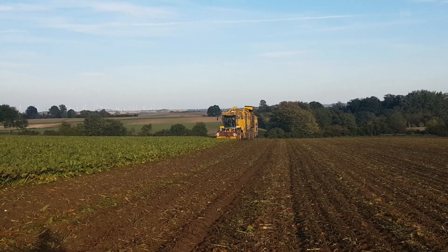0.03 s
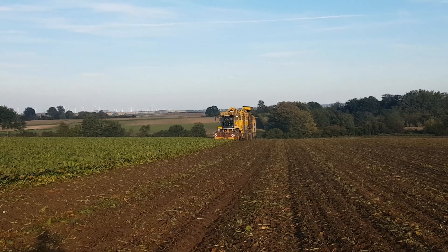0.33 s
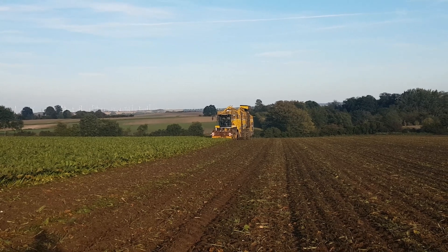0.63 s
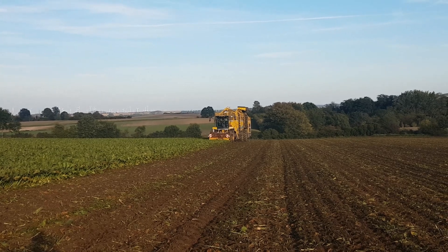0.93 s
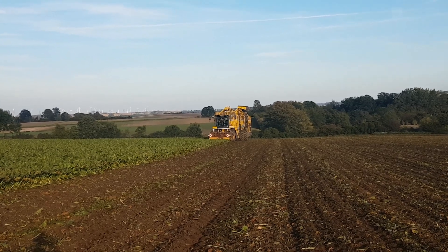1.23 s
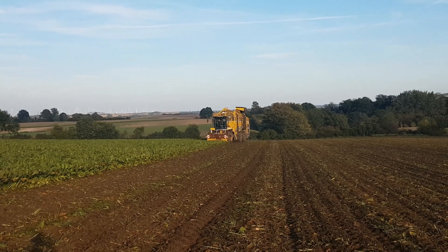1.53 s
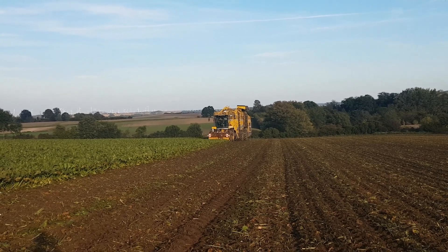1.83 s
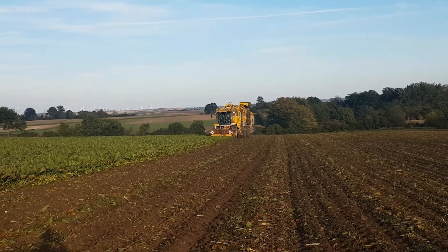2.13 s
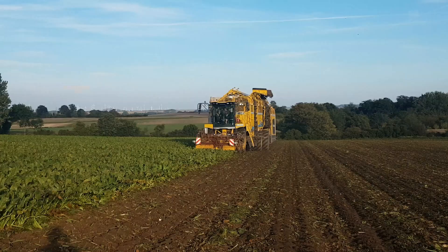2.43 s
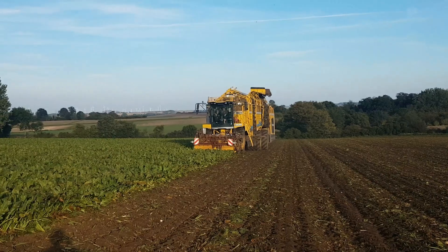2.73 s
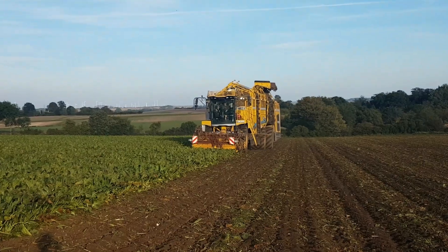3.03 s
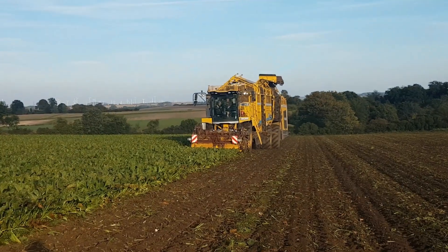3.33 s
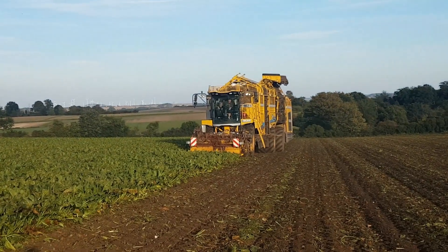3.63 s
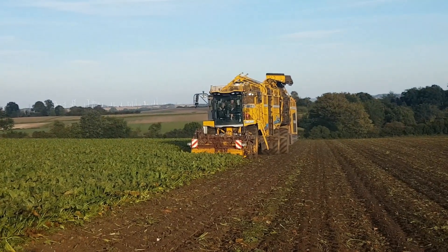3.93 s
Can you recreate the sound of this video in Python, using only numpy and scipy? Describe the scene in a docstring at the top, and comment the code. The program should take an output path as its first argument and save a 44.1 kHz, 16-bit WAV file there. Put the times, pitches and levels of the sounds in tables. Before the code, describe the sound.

A large harvesting machine drones and rattles far across a field, slightly right of the microphone. The engine swells, then with a small click it is abruptly near, its clatter and hum louder, with hard knocks and a few ticks.

```python
"""A beet harvester works along a field towards a stereo microphone, first far off, then abruptly near.
Its diesel exhaust drones and beats against a slightly faster shaft, the leaf flail hums, and the
machinery hisses and clatters in time with the firings, with scattered hard knocks. A small click marks
the jump in distance, and close up a few bright ticks come through. The machine stands right of centre,
over faint microphone hiss."""
import sys
import numpy as np
from scipy.fft import rfft, irfft, next_fast_len
from scipy.io import wavfile
from scipy.ndimage import map_coordinates

SR = 44100
rng = np.random.default_rng(int(sys.argv[2]) if len(sys.argv) > 2 else 0)


def waveform_to_disk(signal):
    """Save audio, clipped to [-1, 1], as 16-bit WAV at the path in sys.argv[1]."""
    frames = np.transpose(np.atleast_2d(signal))
    scaled = np.clip(frames, -1, 1) * 32767
    samples = np.round(scaled).astype(np.int16)
    wavfile.write(sys.argv[1], SR, samples)


N = 176400
NEAR_START_S, TOP_HZ = 2.4205, 15780

# engine speed: time_s, firing_hz
FIRING_RATE = [(0, 63.8), (.7, 63.5), (1.3, 63.7), (1.7, 62.95), (2.3, 62.75), (2.9, 62.85), (3.25, 64),
               (3.6, 63.7), (4, 63.4)]
# exhaust gain, rising with the approach: time_s, gain_db
EXHAUST_GAIN = [(0, -46), (.8, -46), (1.55, -46), (1.75, -44), (1.95, -38), (2.15, -36.5), (2.4, -34.5),
                (2.44, -29.5), (3.1, -29.5), (3.55, -28), (4, -27.5)]
# overtone mix of the exhaust: firing_multiple, far_db, near_db
EXHAUST_OVERTONES = [(1, -22, -14), (2, -.5, 0), (3, -3.5, -5), (4, -18, -17), (5, -23, -30),
                     (6, -33, -30.5)]
# how much faster than the firings the shaft turns: time_s, beat_hz
SHAFT_BEAT = [(0, 4.55), (2.2, 4.45), (2.5, 5), (2.9, 4.3), (3.2, 3.7), (4, 3.7)]
# overtone mix of the shaft: shaft_multiple, relative_db
SHAFT_OVERTONES = [(1, -10), (2, -13), (3, -18.5)]
# colour of the exhaust puffs: frequency_hz, relative_db
RUMBLE_COLOUR = [(20, -20), (45, -23.5), (70, -5), (115, 2.5), (170, 0.5), (220, -1.5), (280, -21),
                 (400, -40), (800, -82)]
# hum of the leaf flail: rotor_multiple (rounded in use), far_db, near_db (before the swell)
FLAIL_OVERTONES = [(17, -70, -63.5), (18, -62, -51.5), (20, -61.5, -55.5), (21, -65, -68), (25, -70.5, -59),
                   (34, -56.5, -45.5), (36, -56, -47), (40, -57.5, -52), (44, -60.5, -67),
                   (48, -61.5, -60.5), (70.9, -70, -57.5)]
# swell of the flail once near: time_s, gain_db
FLAIL_NEAR_SWELL = [(2.42, 0), (2.8, -5), (2.96, 2.5), (3.3, -0.5), (3.6, 2.5), (4, 2.5)]
# machinery noise far and near, notched by the ground reflection: frequency_hz, relative_db
FAR_COLOUR = [(150, -18), (290, -19.5), (350, -11), (410, -15), (500, -9), (640, -1), (850, -0.5),
              (1000, -10.5), (1150, -3.5), (1320, 0.5), (1560, -13), (1750, -4), (1950, -7), (2160, -19.5),
              (2400, -10), (2750, -13.5), (3220, -6), (3480, -14.5), (3680, -11), (3980, -19.5),
              (4750, -17.5), (5130, -15.5), (5450, -21.5), (6500, -27), (7500, -37), (9500, -55.5),
              (15500, -56)]
NEAR_COLOUR = [(150, -8), (280, 1.5), (400, -4), (490, -4), (570, 3.5), (700, 6), (820, 4), (960, -5.5),
               (1100, 1.5), (1400, -3), (1750, 1), (2000, -14), (2220, -1), (2540, -12.5), (2870, -3.5),
               (3220, -8), (3530, -2.5), (3880, -10), (4300, -4), (4750, -10), (5500, -18), (6500, -19.5),
               (7500, -26.5), (8500, -31), (10000, -37.5), (15500, -36)]
# machinery loudness far and near: time_s, level_db
FAR_LOUDNESS = [(0, -45), (.35, -44), (.8, -46), (1.02, -46), (1.15, -43.5), (1.45, -44.5), (1.9, -44.5),
                (2.2, -44.5), (2.42, -45.5)]
NEAR_LOUDNESS = [(2.42, -39.5), (2.65, -39), (2.9, -38.5), (3.07, -41), (3.22, -38.5), (3.4, -39),
                 (3.54, -37.5), (3.62, -40.5), (3.7, -39), (4, -38.5)]
# hard knocks in the machinery: start_s, level_db
KNOCK_HITS = [(.652, -42), (2.471, -38), (2.648, -36), (3.012, -39), (3.244, -38), (3.513, -37),
              (3.545, -38), (3.685, -34), (3.78, -36), (3.987, -35)]
# colour of a knock: frequency_hz, relative_db
KNOCK_SPECTRUM = [(500, -20), (1500, -3), (2600, -4), (4300, 0), (5500, -13), (9000, -32), (15000, -48)]
# small bright ticks: start_s, level_db
TICK_HITS = [(2.472, -57), (3.404, -46), (3.722, -46.5)]
# colour of a tick: frequency_hz, relative_db
TICK_SPECTRUM = [(1500, -32), (5000, 8), (9000, -8), (15000, -16)]
# the machine's place in the stereo image: frequency_hz, left_minus_right_db
STEREO_BALANCE = [(60, .3), (125, -1.1), (190, -1.5), (270, -2.6), (450, -3.8), (740, -4.9), (1220, -4.3),
                  (2000, -5), (3300, -11), (5500, -12.5), (7000, -5), (9000, 1), (15000, -2)]
# likeness of the noise left and right: frequency_hz, correlation
STEREO_LIKENESS = [(100, .997), (500, .985), (1000, .96), (2000, .93), (4000, .88), (8000, .7), (12000, .3)]
# mismatch of the two microphone ports: frequency_hz, right_lead_rad
MIC_PORT_PHASE = [(64, .3), (127, .34), (330, .25), (1200, .11), (1800, .2), (2800, .6), (4200, .4),
                  (8000, 0)]
# colour of the microphone hiss: frequency_hz, relative_db; then its overall level
HISS, HISS_DB = [(100, 0), (8000, 1), (10000, -2.6), (13000, 0), (15500, -2)], -70


def amp(db):
    """Decibels to gain."""
    return 10 ** (np.asarray(db) / 20)


def unit(x):
    """Scale to rms 1."""
    return x / np.sqrt(np.mean(x ** 2) + 1e-20)


def along(rows, hz):
    """Read (frequency_hz, value) rows on a log axis."""
    frequencies, values = np.transpose(rows)
    return np.interp(np.log(hz + 1), np.log(frequencies + 1), values)


def curve(rows):
    """(time_s, value) rows as one value per sample."""
    return np.interp(np.arange(N) / SR, *np.transpose(rows))


def wobble(rate_hz):
    """A smooth random curve with rate_hz knots a second."""
    return map_coordinates(rng.standard_normal(2048), [np.arange(N) * rate_hz / SR + 4], mode="mirror")


def filtered(x, response):
    """Pass x through a frequency response."""
    size = next_fast_len(N + SR // 2)
    return irfft(rfft(x, size) * response(np.fft.rfftfreq(size, 1 / SR)), size)[..., :N]


def noise(colour):
    """Coloured stereo noise of rms 1, nearly mono in the bass."""
    def mid_and_side(hz):
        width = np.arccos(along(STEREO_LIKENESS, hz)) / 2
        return amp(along(colour, hz)) * [np.cos(width), np.sin(width)]
    mid, side = filtered(rng.standard_normal((2, N)), mid_and_side)
    return unit(np.array([mid + side, mid - side]))


def overtone(turns, order, waver_db, drift_rad, rate_hz):
    """One slightly unsteady overtone of a rotation, rms 1."""
    phase = 2 * np.pi * round(order) * turns + drift_rad * wobble(rate_hz)
    return unit(np.sin(phase) * amp(waver_db * wobble(rate_hz)))


def diesel(firings):
    """Exhaust drone, a beating shaft and a puff of rumble at each firing, all swelling together."""
    gain_db = curve(EXHAUST_GAIN)
    closeness = (gain_db - gain_db.min()) / np.ptp(gain_db)
    drone = 0
    for k, far_db, near_db in EXHAUST_OVERTONES:
        pipe_smear = .36 * (k - 1) ** 2 / k  # the pipe spreads a puff's overtones in phase
        tone = overtone(firings + pipe_smear, k, waver_db=1.54, drift_rad=.13, rate_hz=18)
        drone += amp(far_db + closeness * (near_db - far_db)) * tone
    shaft_turns = firings + np.cumsum(curve(SHAFT_BEAT)) / SR + .5
    shaft = sum(amp(db) * overtone(shaft_turns, k, waver_db=1.5, drift_rad=.16, rate_hz=8)
                for k, db in SHAFT_OVERTONES)
    puffs = unit(noise(RUMBLE_COLOUR) * (1 + .39 * np.cos(2 * np.pi * firings)))
    return amp(gain_db) * (drone + shaft + amp(-9.5) * puffs)


def flail(near, rotor_hz=18.23):
    """The leaf rotor hums on multiples of its speed, louder close to the microphone."""
    swell_db = curve(FLAIL_NEAR_SWELL)
    turns = np.cumsum(rotor_hz * (1 + .0014 * wobble(4))) / SR
    hum = 0
    for k, far_db, near_db in FLAIL_OVERTONES:
        tone = overtone(turns + rng.random(), k, waver_db=1.5, drift_rad=.078, rate_hz=12)
        hum += amp(far_db + near * (near_db + swell_db - far_db)) * tone
    return hum


def panels(x, ripple_db=1.6, spacing_hz=45):
    """Many sheet-metal resonances put a fine, steady ripple on the spectrum, less in the bass."""
    knots = rng.standard_normal(1024)
    ripple = lambda hz: map_coordinates(knots, [hz / spacing_hz]) * np.clip(hz / 1500, 0, 1)
    return unit(filtered(x, lambda hz: amp(ripple_db * ripple(hz))))


def machinery(firings, colour, loudness, body_pulse, clatter_pulse, sharpness, scatter_db, flutter_db):
    """Mechanical noise with a burst of uneven size at each firing, most marked in the treble."""
    stroke = firings.astype(int)
    size = amp(scatter_db * rng.standard_normal(512))[stroke]
    lag_cycles = .072 * rng.standard_normal(512)[stroke]
    burst = unit(size * np.exp(-sharpness * (1 + np.cos(2 * np.pi * (firings - lag_cycles)))))
    rush = panels(noise(colour))
    body = filtered(rush, lambda hz: 1 / (1 + (hz / 2300) ** 4))
    clatter = rush - body
    shared_flutter_db = flutter_db * wobble(21.92)

    def pulsing(depth):
        flutter = amp(shared_flutter_db + flutter_db * wobble(45))
        return unit(np.sqrt(1 + (depth * burst) ** 2) * flutter)
    return amp(curve(loudness)) * (body * pulsing(body_pulse) + clatter * pulsing(clatter_pulse))


def at_microphone(x):
    """Set the machine right of centre; the mismatched ports shift the phase between the channels."""
    def response(hz):
        lean = amp(np.outer([1, -1], along(STEREO_BALANCE, hz)) / 2)
        phase = np.outer([-1, 1], along(MIC_PORT_PHASE, hz)) / 2
        return lean / lean.mean(axis=0) * np.exp(1j * phase)
    return filtered(x, response)


def microphone_hiss():
    """The microphone's own steady noise, independent in each channel."""
    white = rng.standard_normal((2, N))
    return amp(HISS_DB) * unit(filtered(white, lambda hz: amp(along(HISS, hz))))


def impacts(hits, colour, t60_s, attack_s=.0007):
    """Knocks or ticks: bursts of noise that rise quickly and die away."""
    envelope = 0
    for start_s, level_db in hits:
        age_s = np.maximum(np.arange(N) / SR - start_s, 0)
        envelope += (1 - np.exp(-age_s / attack_s)) * amp(level_db - 60 * age_s / t60_s)
    return envelope * noise(colour)


def click(height=.055, decay_s=.0012):
    """A small click, one decaying step, as the distance jumps from far to near."""
    age_s = np.arange(N) / SR - NEAR_START_S
    return height * (age_s >= 0) * np.exp(-np.abs(age_s) / decay_s)


def scene():
    """The harvester heard from across the field, then from close by."""
    firings = np.cumsum(curve(FIRING_RATE)) / SR  # running count
    near = np.clip((np.arange(N) / SR - NEAR_START_S) / .003, 0, 1)  # 0 far off, 1 close by
    distant = machinery(firings, FAR_COLOUR, FAR_LOUDNESS, body_pulse=.29, clatter_pulse=.67,
                        sharpness=1.6, scatter_db=3.0, flutter_db=.64)
    close = machinery(firings, NEAR_COLOUR, NEAR_LOUDNESS, body_pulse=.42, clatter_pulse=.64,
                      sharpness=2.7, scatter_db=2.5, flutter_db=.41)
    harvester = diesel(firings) + flail(near) + (1 - near) * distant + near * close
    knocks = impacts(KNOCK_HITS, KNOCK_SPECTRUM, t60_s=.03)
    hiss = microphone_hiss()
    ticks = impacts(TICK_HITS, TICK_SPECTRUM, t60_s=.052)
    return at_microphone(harvester + knocks) + hiss + click() + ticks


def record(dry):
    """Nothing passes above the band limit."""
    return filtered(dry, lambda hz: hz < TOP_HZ)


dry = scene()
out = record(dry)
waveform_to_disk(out)
```